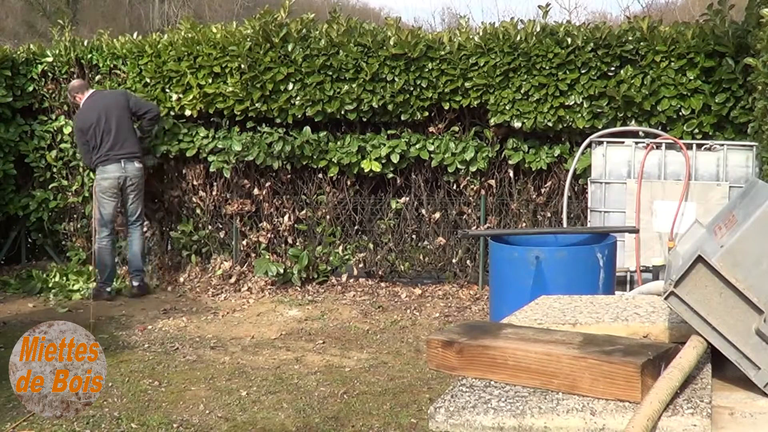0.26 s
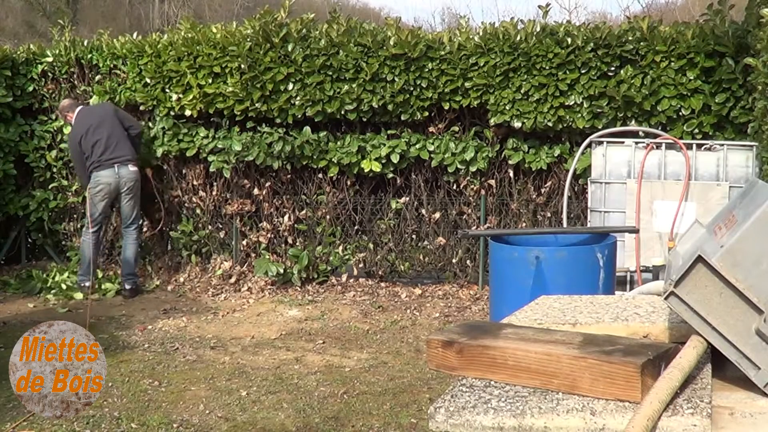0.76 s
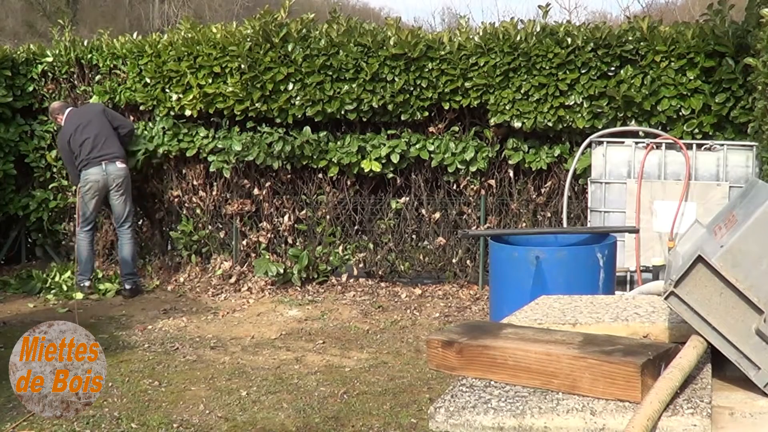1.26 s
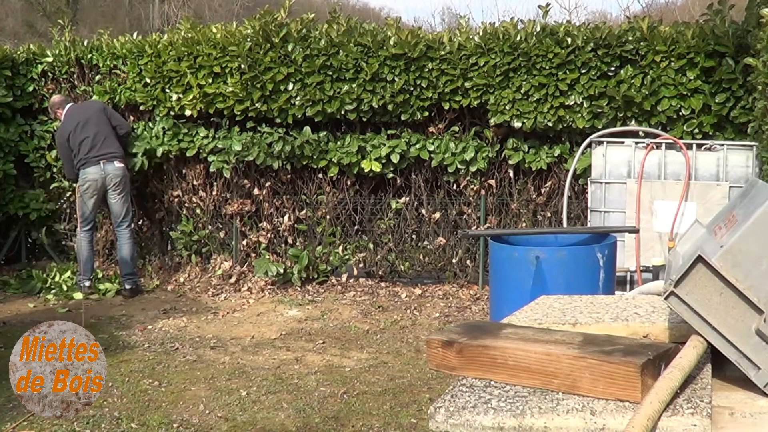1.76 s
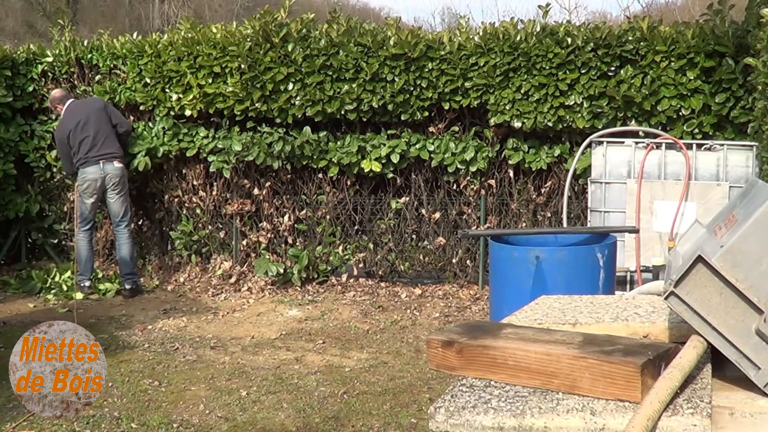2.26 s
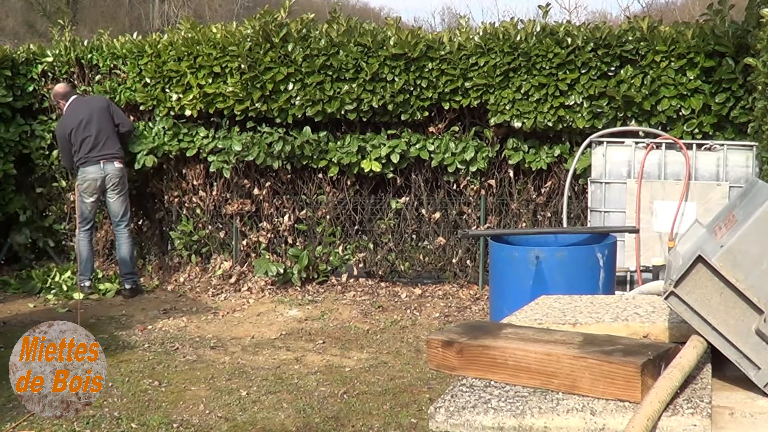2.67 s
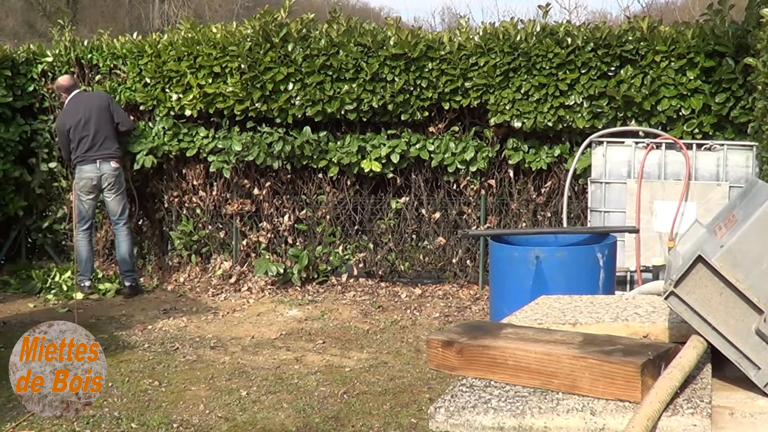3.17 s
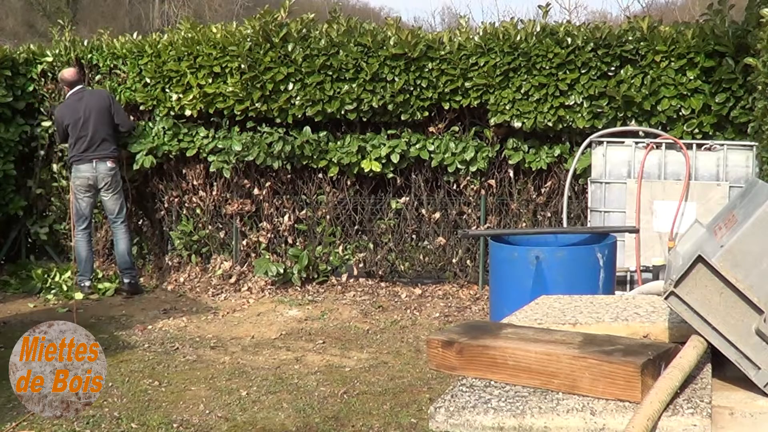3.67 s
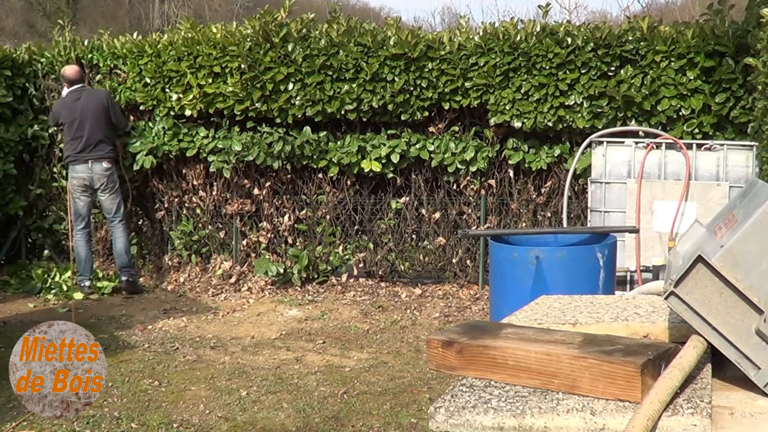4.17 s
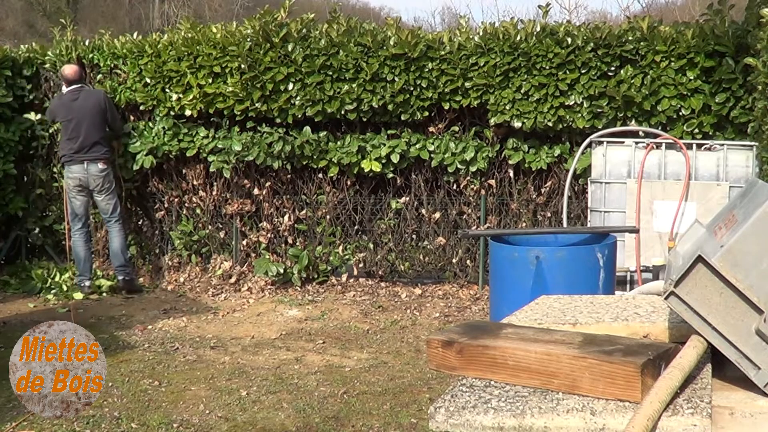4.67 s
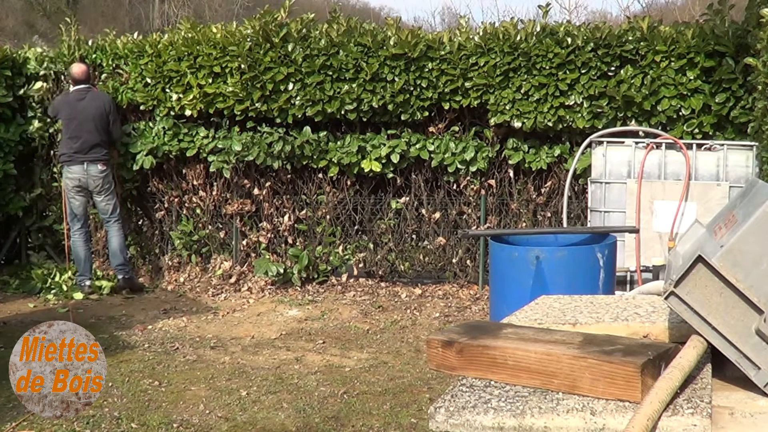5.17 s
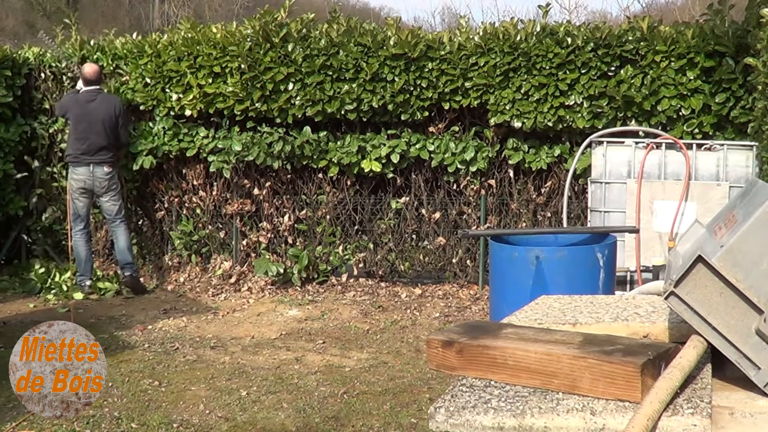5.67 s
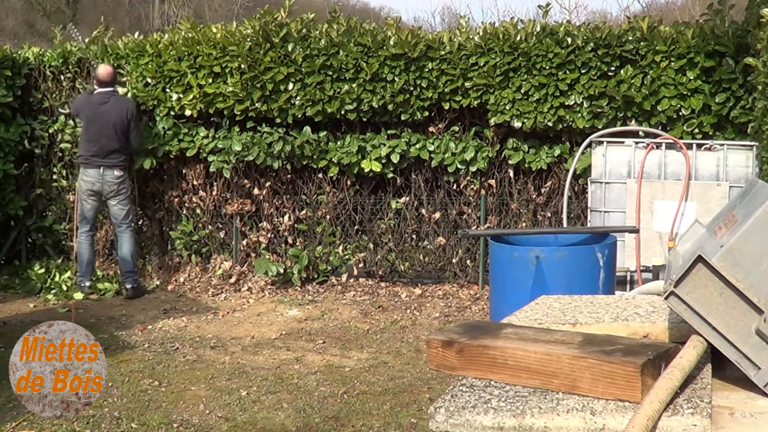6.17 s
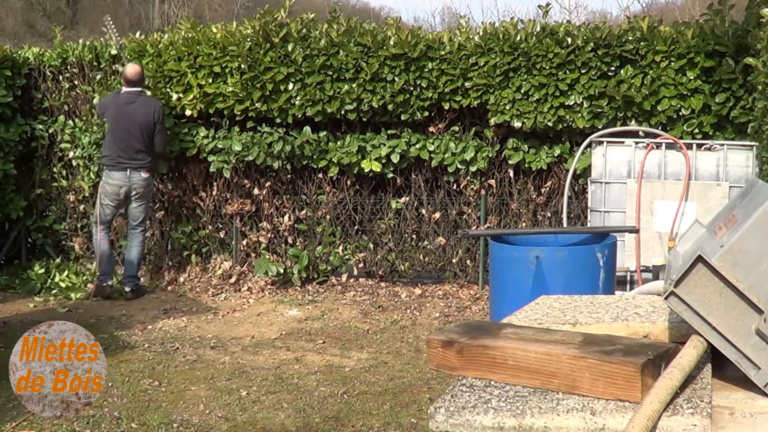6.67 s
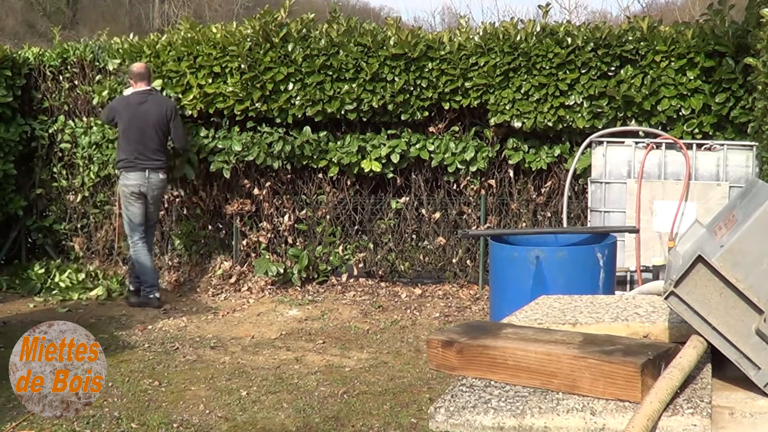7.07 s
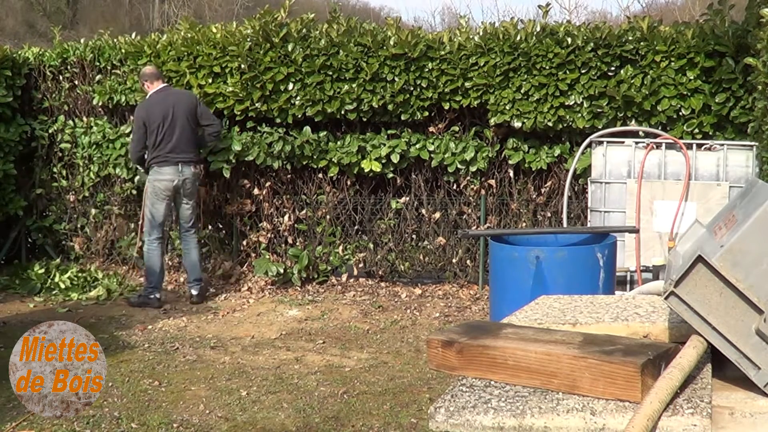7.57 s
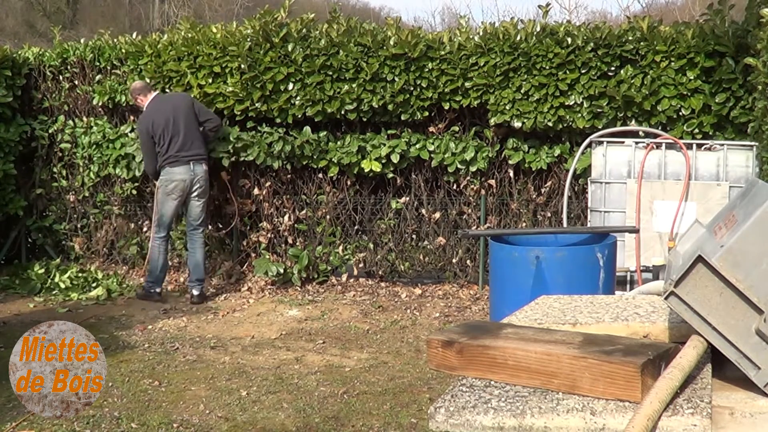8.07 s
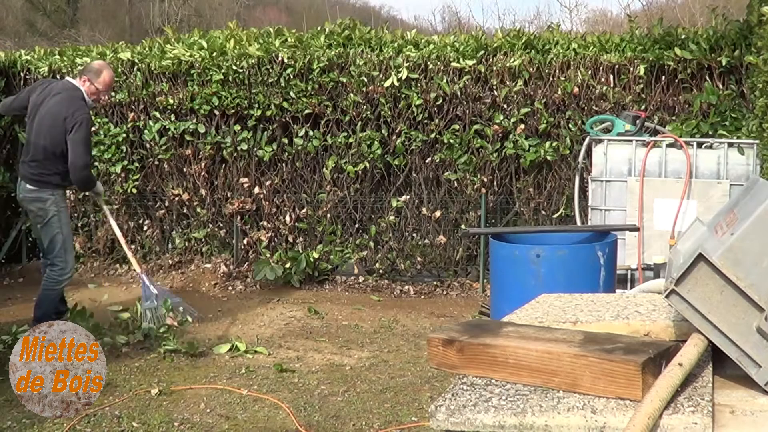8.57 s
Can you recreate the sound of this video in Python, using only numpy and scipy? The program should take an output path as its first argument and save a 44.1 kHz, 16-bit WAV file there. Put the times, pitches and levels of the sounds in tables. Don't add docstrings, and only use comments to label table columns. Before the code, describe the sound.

A stereo camera microphone a few metres off picks up a hedge trimmer starting, roaring with harsh bright hiss, gear whine and casing rattle, and chopping woody stems. After about seven seconds its pitch slides down and stops. Twigs tick, soft steps and a puff of wind thump low, then a wire rake scratches and snags sharply through leaves, over distant traffic and engine hum.

```python
import sys
import numpy as np
from scipy import signal
from scipy.fft import rfft, irfft, next_fast_len
from scipy.io import wavfile
from scipy.ndimage import uniform_filter1d

SR = 44100
rng = np.random.default_rng(int(sys.argv[2]) if len(sys.argv) > 2 else 0)


def transcribe(u):
    v = np.clip(np.atleast_2d(u).T, -1, 1)
    q = np.round(v * 32767).astype(np.int16)
    wavfile.write(sys.argv[1], SR, q)


def decibels_to_gain(level_db):
    exponent = np.asarray(level_db, float) / 20
    return 10 ** exponent


N = 389403
T = np.arange(N) / SR
SCENE_CHANGE_S = 8.163
SIDES = np.array([[1], [-1]])

# frequency in Hz, density in dB per Hz.
HUSH_COLOUR = [(15, -37), (25, -23), (43, -1.5), (206, -5), (236, 0.5), (301, 0), (363, -5), (394, -2.5),
               (607, -7), (887, -3), (1290, -7), (9570, -28), (14800, -42), (16000, -37)]
HUSH_LATER_COLOUR = [(15, -60), (25, -23), (91, -15.5), (233, -13), (273, -4), (420, -17.5), (700, -12),
                     (1100, -16), (1300, -8), (2000, -17), (2830, -20.5), (10300, -22.5), (12500, -35),
                     (16000, -34)]
# time in seconds, level in dB.
HUSH_LEVEL = [(0, -34), (.1, -37.5), (.4, -39), (7, -41.5), (7.9, -41), (8.15, -43.5)]
HUSH_LATER_DB = -35.5
# frequency in Hz, level in dB, width in Hz.
ENGINE_LINES = [(101, -56.5, 2.7), (130.5, -57, 2.05), (265.5, -49, 2.1)]
ENGINE_LINES_LATER = [(102.8, -52, 2.53), (135, -53, 3.014), (274, -41.5, 0.57), (283.5, -52, 0.6),
                      (298, -52, 2.1), (400, -53.5, 3.54)]
# start in seconds, length in seconds, level in dB.
GUSTS = [
    (1.0, .2, -58),
    (4.4, 1.0, -58),
    (6.25, 0.45, -57),
    (7.3, 0.23, -55),
    (7.7, 0.23, -44.5),
]
# start in seconds, peak in dB, frequency in Hz (minus: first a pull), t60 in seconds.
FOOTFALLS = [
    (7.349, -38, 46.13, 0.082),
    (7.591, -37, 59.76, 0.074),
    (7.659, -37, 51.1, 0.08),
    (7.8857, -26, -45, 0.04),
    (7.896, -36, 40, .05),
    (7.9075, -22, -110, 0.02),
    (7.921, -24, 100, 0.03),
    (7.926, -32, -50, 0.036),
]
# start in seconds, length in seconds, level in dB.
LEAF_BRUSHES = [(0.004, 0.071, -43.5), (.12, 0.14, -46), (.315, 0.019, -45), (.382, .006, -46),
                (.415, .02, -52), (7.55, 0.04, -30.5), (7.65, 0.049, -47), (7.7, 0.53, -58),
                (7.776, 0.03, -43), (7.9, .03, -65), (7.97, .02, -54), (8.07, 0.03, -47), (8.11, .06, -45),
                (7.865, .02, -59)]
# start in seconds, length in seconds, level in dB.
RAKE_DRAGS = [
    (8.165, 0.16, -25),
    (8.362, .01, -46),
    (8.66, .04, -41),
]
# frequency in Hz, density in dB per Hz.
RAKE_COLOUR = [(120, -43), (200, -6), (273, -6), (328, -9), (671, -5.5), (950, -7), (1320, -7),
               (3250, -8.5), (8740, -3), (10500, -3), (16000, -27)]
# start in seconds, peak in dB, centre frequency in Hz, length in seconds.
TINE_SLIPS = [
    (8.173, -16, 7900, 0.017),
    (8.199, -11, 8250, 0.006),
    (8.2521, -10, 9350, 0.006),
    (8.323, -10.5, 8660, 0.01),
    (8.364, -9.5, 8000, 0.007),
]
# start in seconds, peak in dB, centre in Hz, length in seconds.
TIP_RINGS = [
    (.3022, -20, 14000, .002),
    (7.532, -32, 14000, .003),
    (8.365, -12, 6700, .008),
    (8.366, -16, 10600, .006),
    (8.174, -19, 10500, .006),
    (8.324, -21, 16000, .006),
    (8.365, -24, 14500, .005),
    (8.174, -22, 14500, .006),
]
# start in seconds, peak in dB, centre in Hz, length in seconds.
CLICKS = [(0.3022, -10, 10500, 0.00099), (.303, -27, 9000, .012), (0.38, -30, 7000, 0.002),
          (.3845, -23, 10650, .002), (.425, -27, 8000, .002), (0.4125, -29, 6790, 0.005),
          (0.4335, -20, 7500, 0.005), (.429, -25, 2800, .012), (.43, -23, 800, .01),
          (0.4544, -19, 9420, 0.0054), (7.4994, -22, 7000, 0.005), (7.532, -18, 9500, 0.004),
          (7.567, -22, 6004, 0.005), (7.5994, -28, 4790, 0.005), (7.7767, -25, 6320, 0.005),
          (7.8044, -24, 8620, 0.004), (7.9029, -33, 7050, 0.0052), (7.927, -31, 5500, 0.008),
          (7.973, -30, 3300, 0.003)]
# start in seconds, peak in dB, centre in Hz, length in seconds.
STEM_CHOPS = [(0.707, -18, 2260, 0.005), (0.81, -14, 1320, 0.005), (0.939, -20, 1080, 0.005),
              (1.159, -16, 1170, 0.005), (1.42, -16, 1030, 0.0046), (1.49, -14, 1620, 0.005),
              (1.848, -17, 810, 0.0043), (2.346, -14, 2080, 0.005), (2.808, -6, 1550, 0.005),
              (2.856, -10, 1520, 0.005), (2.972, -20, 2410, 0.005), (3.021, -13, 1530, 0.005),
              (3.112, -11, 2080, 0.005), (3.16, -13, 2340, 0.005), (3.869, -11, 2094, 0.005),
              (4.199, -15, 1800, 0.005), (4.288, -5, 1530, 0.0054), (4.535, -17, 1460, 0.005),
              (4.624, -16, 1490, 0.005), (4.729, -13, 1680, 0.005), (4.78, -8, 1490, 0.005),
              (4.93, -6, 1610, 0.0054), (5.033, -6.5, 1800, 0.0055), (5.107, -7, 1180, 0.005),
              (5.58, -13, 1570, 0.005), (5.649, -14, 2280, 0.005), (5.674, -5, 2450, 0.005),
              (5.77, -13, 1120, 0.0046), (5.797, -14, 2270, 0.005), (5.934, -7, 1810, 0.0058),
              (6.288, -10, 2460, 0.005), (6.333, -5, 2475, 0.0048), (6.379, -12, 1765, 0.005),
              (6.85, -13, 2690, 0.005)]
CHOP_DB = -2.5
# time in seconds, load from 0 to 1.
BLADE_LOAD = [
    (.44, .3),
    (.6, .4),
    (.75, 1),
    (6.93, 1),
    (7.02, .1),
    (7.78, .1),
]
# frequency in Hz, density in dB per Hz.
BLADE_COLOUR = [(200, -17), (320, -14.5), (600, -3.5), (1100, -5.5), (1330, -8), (1550, -5), (2400, -4.5),
                (4000, -4), (7000, -1.5), (9700, 1), (10800, -0.5), (12000, -7.5), (13800, -8.5),
                (16000, -19.5)]
# time in seconds, rate in Hz.
TOOTH_RATE = [(1.2, 1660), (2.2, 1610), (2.55, 1508), (2.8, 1544), (3.3, 1496), (4.12, 1604), (4.28, 1480),
              (4.78, 1469), (4.84, 1435), (5.15, 1436), (5.3, 1590), (5.55, 1626), (5.63, 1473),
              (5.72, 1450), (5.95, 1519), (6.5, 1533), (6.8, 1700), (6.96, 1495)]
ON_S, OFF_S = .428, 6.96
SPIN_UP_HZ, SPIN_UP_S = 980.7, .26
FRICTION_HZ, COAST_S = 3466, 2.8
TEETH_PER_TURN, PINION_TEETH = 70, 4
# multiple of the rotor turns, level in dB while cutting.
ROTOR_ORDERS = [(1, -48), (2, -56), (3, -68), (6, -68), (8, -39), (12, -64)]
# start in seconds, length in seconds, level in dB.
MESH_SONGS = [(.512, 0.04, -29), (.57, .04, -39), (1.29, .07, -32), (1.45, 0.16, -36), (1.69, 0.33, -35),
              (2.53, 0.087, -30.5), (2.65, 0.26, -31), (2.95, 0.22, -33), (4.1, 0.041, -30),
              (4.3, 0.34, -29.5), (4.715, .07, -27.5), (5.03, 0.02, -36), (5.1, .015, -33),
              (5.42, 0.04, -31), (5.5, 0.063, -30), (5.56, .02, -29), (5.62, 0.07, -31), (5.95, 0.13, -36),
              (6.1, 0.098, -31.5), (6.81, 0.02, -35), (6.86, .015, -31)]
MESH_DB = -41
# frequency in Hz, level in dB.
RADIATION = [(400, -52), (500, -47), (600, -27), (900, -30), (1200, -23.5), (1600, -30), (2500, -34.5),
             (3500, -23), (4400, -44)]
# time in seconds, length in seconds, gain in dB.
BACKLASH = [
    (6.989, 0.044, -10),
    (7.108, 0.013, -13),
    (7.35, 0.017, -8),
    (7.447, 0.018, -3),
    (7.51, 0.059, -5.5),
    (7.731, 0.056, -14),
]
# start in seconds, length in seconds, level in dB.
SECOND_SONGS = [
    (7.07, 0.11, -37),
    (7.2, 0.11, -40),
    (7.38, 0.046, -33),
    (7.455, 0.059, -37),
    (7.575, 0.1, -39.5),
]
THIRD_SONGS = [
    (7.1, .03, -36),
    (7.17, 0.058, -36),
    (7.29, .04, -44),
    (7.46, 0.039, -54),
    (7.585, 0.048, -43),
]
FOURTH_SONGS = [
    (7.19, .015, -43),
    (7.29, .015, -40),
    (7.36, 0.091, -43),
    (7.55, .02, -52),
]
# frequency in Hz, width in Hz, level in dB relative to the hiss.
HOUSING_MODES = [(825, 6.7, -31.5), (1145, 190, -25), (1704, 170, -24), (2250, 31, -26.5), (2410, 72, -28),
                 (2556, 250, -34), (3240, 210, -34), (3824, 92, -25.5), (4800, 340, -33)]
# start in seconds, level in dB, frequency in Hz, length in seconds.
TWIG_BITES = [(0.907, -33, 1200, 0.3), (1.17, -35.0, 2580.0, 0.034), (1.265, -39, 4260.0, 0.031),
              (1.358, -36, 950.0, 0.054), (1.524, -31, 2930.0, 0.16), (1.564, -34, 900.0, 0.21),
              (1.816, -34.5, 880, 0.23), (2.441, -33, 3230.0, 0.048), (3.026, -29, 4390.0, 0.025),
              (3.096, -31, 2070.0, 0.05), (3.29, -32, 2340, 0.03), (4.56, -41, 2900, 0.21),
              (4.78, -33, 3900, .07), (4.98, -33, 3900, 0.065), (5.04, -35, 2350, .2),
              (.69, -33, 2250, .08), (.68, -37, 3070, .25), (.88, -34, 2250, .15), (4.6, -35, 1120, 0.23),
              (5.08, -36, 1120, .15), (6.551, -33, 1600, .2), (5.3, -34, 1100, 0.27),
              (1.3, -36.5, 1110, .8), (3.15, -35, 3100, .15), (3.602, -32, 2063, 0.043),
              (3.779, -28.5, 2070.0, 0.053), (4.541, -32, 3830.0, 0.031), (4.699, -37.0, 4390.0, 0.037),
              (5.606, -30, 2282, 0.23), (5.626, -30, 4350.0, 0.048), (5.648, -32, 2930.0, 0.043),
              (5.892, -30, 1150, 0.071), (5.909, -29, 1854, 0.035), (5.913, -31, 4574, 0.17),
              (6.012, -32, 1810.0, 0.048), (6.13, -34, 4390.0, 0.043), (6.153, -32, 1160.0, 0.052),
              (6.169, -32, 2110.0, 0.045), (6.174, -30, 2630.0, 0.173), (6.266, -32, 1850.0, 0.112),
              (6.316, -31, 4010.0, 0.022), (6.454, -28, 2146, 0.067), (6.618, -34, 4290, 0.031),
              (6.708, -30.5, 2680, 0.17), (6.748, -28.5, 1714, 0.13), (6.763, -30, 3360.0, 0.077),
              (6.911, -26, 3360.0, 0.028)]
HISS_DB, HISS_DB_PER_OCTAVE, IDLE_DB = -20, 13, -3
# level in dB facing away, gain in dB by facing,
# gain in dB per octave slower.
PART_LAWS = [(-10.5, 3.5, 10), (-8.5, -4.5, 8), (-23, 9, 6)]
# time in seconds, share of the gearbox side shown from 0 to 1.
FACING = [(.5, 0), (1.1, 0.1), (1.6, 0.05), (2.2, 0.25), (2.7, 0.25), (3.2, 0.83), (3.6, 0.7), (4.1, 0.78),
          (4.9, 0.78), (5.3, 0.9), (5.7, 0.75), (6.3, 0.8), (7, 0.85), (7.5, 0.52)]
CASING_HIDDEN = 0.2
# time in seconds, length in seconds, hiss in dB, gearbox in dB.
SNAGS = [(1.204, .03, 0.5, 4), (1.502, .03, 0, 1), (2.718, 0.052, -2.5, -4), (2.872, 0.023, 1, 7),
         (2.93, 0.068, -2, -4), (3.2, 0.017, -3, 9), (3.272, 0.019, -3, 1), (2.3, 0.011, 0.5, -20),
         (5.164, 0.12, -1, -4), (.66, 0.039, 2, -2), (.75, 0.077, 1, 2), (.95, 0.086, 0.6, 0),
         (4.46, 0.22, 0, -0.5), (5.701, 0.15, 0, 1.5), (6.25, 0.095, 0, 3), (6.983, 0.015, -0.5, 11),
         (7.52, 0.067, 5.5, -6)]


def curve(table):
    s, *columns = np.transpose(table)
    return [np.interp(T, s, column) for column in columns]


def during(t0, t1, fade=0.0017):
    return np.clip(np.minimum(T - t0, t1 - T) / fade, 0, 1)


def swells_db(rows, rise_s, fall_s):
    gain = 0
    for s, length, db in rows:
        early, late = np.maximum(s - T, 0), np.maximum(T - s - length, 0)
        gain = gain + decibels_to_gain(db) * np.exp(-early / rise_s - late / fall_s)
    return 20 * np.log10(gain + 1e-9)


def walk(rate):
    hold = int(SR / rate)
    return uniform_filter1d(np.repeat(rng.standard_normal(N // hold + 1), hold), hold)[:N]


def flicker(rate):
    x = walk(rate)
    return x - uniform_filter1d(x, int(6 * SR / rate))


def filtered(x, order, hz, kind):
    return signal.sosfilt(signal.butter(order, hz, kind, fs=SR, output="sos"), x)


def grains(rate, spread_db):
    sizes = decibels_to_gain(spread_db * np.minimum(rng.exponential(size=N), 3.5))
    starts = (rng.random(N) < rate / SR) * sizes
    decay = np.exp(-1 / (0.00057 * SR))
    x = rng.standard_normal(N) * signal.lfilter([1], [1, -decay], starts)
    return x / x.std()


def bands(x, colour, ref, gain_db):
    size = next_fast_len(N)
    f = np.maximum(np.arange(size // 2 + 1) * SR / size, 1)
    hz, db = np.transpose(colour)
    shape = decibels_to_gain(np.interp(np.log(f), np.log(hz), db))
    inside = (f > ref[0]) & (f < ref[1])
    spec = rfft(x, size) * shape / np.sqrt(np.sum(shape[inside] ** 2) / len(f))
    out = 0
    for step in range(int(2 * np.log2(hz[0])), int(2 * np.log2(hz[-1])) + 2):
        share = np.cos(np.pi / 2 * np.clip(2 * np.log2(f) - step, -1, 1)) ** 2
        out = out + irfft(spec * share, size)[..., :N] * decibels_to_gain(gain_db(2 ** (step / 2)))
    return out


def hits(table, width, top_hz=12000):
    out, t = np.zeros(N + SR), np.arange(SR // 8) / SR
    for s, db, hz, length in table:
        edges = np.clip([hz / width, hz * width], 20, top_hz)
        noise = filtered(rng.standard_normal(len(t)), 2, edges, "band")
        start = int(s * SR)
        out[start:start + len(t)] += decibels_to_gain(db - 9.5) * noise / noise.std() * np.exp(-(t / length) ** 2)
    return out[:N]


def drone(lines):
    out = 0
    for hz, db, width in lines:
        phase = 2 * np.pi * np.cumsum(hz + width * walk(6)) / SR
        out = out + decibels_to_gain(db + 2 + 1.1 * walk(11.0)) * np.sin(phase)
    return out


def garden():
    mid, side = rng.standard_normal((2, N))
    side = filtered(side, 1, 250, "high") + 0.097 * side
    air = mid + 0.29 * side * SIDES
    level_db, = curve(HUSH_LEVEL)

    def before_db(hz):
        return level_db + walk(9.6) + (hz < 70) * -1.5

    def after_db(hz):
        return HUSH_LATER_DB + 1.2 * walk(5.3)

    before = bands(air, HUSH_COLOUR, (25, 16000), before_db) + drone(ENGINE_LINES)
    after = bands(air, HUSH_LATER_COLOUR, (25, 16000), after_db) + drone(ENGINE_LINES_LATER)
    return before * during(-1, SCENE_CHANGE_S) + after * during(SCENE_CHANGE_S, 10)


def wind():
    puffs = filtered(rng.standard_normal((2, N)), 2, [33, 70], "band")
    puffs = puffs[0] + 0.17 * puffs[1] * SIDES
    return puffs / puffs.std() * decibels_to_gain(swells_db(GUSTS, rise_s=.08, fall_s=0.11))


def footfalls():
    out = 0
    for s, db, hz, t60 in FOOTFALLS:
        decay = (T > s) * np.exp(-np.log(1000) * np.abs(T - s) / t60)
        out = out + decibels_to_gain(db) * np.sin(2 * np.pi * hz * (T - s)) * decay
    return out


def rustle():
    level_db = swells_db(LEAF_BRUSHES, rise_s=.006, fall_s=0.038)
    leaves = rng.standard_normal(N) + 0.54 * grains(1200, spread_db=6.0)

    def gain_db(hz):
        return level_db + (hz > 9000) * 0.52 + walk(30)

    bright = bands(leaves / leaves.std(), BLADE_COLOUR[6:], (3500, 12000), gain_db)
    return bright * (during(-1, .43) + during(7.55, SCENE_CHANGE_S, fade=0.11))


def rake():
    top_db = swells_db(RAKE_DRAGS, rise_s=0.0026, fall_s=0.091)
    low_db = -12.5 - 0.59 * (top_db + 23.5)
    grit = rng.standard_normal(N) + 0.61 * grains(2500, spread_db=4.0)
    shared = 0.75 * walk(50)

    def gain_db(hz):
        return top_db + shared + 0.86 * walk(25) + (hz < 2200) * (low_db + 9.0)

    return during(SCENE_CHANGE_S, 10) * bands(grit / grit.std(), RAKE_COLOUR, (3000, 12000), gain_db)


def snaps():
    small = hits(CLICKS, width=1.54) + hits(TINE_SLIPS, width=1.7)
    ringing = hits(TIP_RINGS, width=1.1, top_hz=15700)
    return small + ringing + decibels_to_gain(CHOP_DB) * hits(STEM_CHOPS, width=2.14)


def tooth_rate():
    hz = curve(TOOTH_RATE)[0] - SPIN_UP_HZ * np.exp(-np.maximum(T - ON_S, 0) / SPIN_UP_S)
    slowing = np.exp(-np.maximum(T - OFF_S, 0) / COAST_S)
    return np.maximum((hz + FRICTION_HZ) * slowing - FRICTION_HZ, 100)


def coasting_levels_db(hz):
    at, sent_db = np.transpose(RADIATION)
    loose_db = sum(db * np.exp(-((T - s) / length) ** 2) for s, length, db in BACKLASH)
    levels = [loose_db + np.interp(np.log(hz), np.log(at), sent_db)]
    for songs in (SECOND_SONGS, THIRD_SONGS, FOURTH_SONGS):
        levels.append(swells_db(songs, rise_s=0.0085, fall_s=0.014) + 0.5)
    return levels


def whine():
    coasting, hz, (load,) = T > OFF_S, tooth_rate(), curve(BLADE_LOAD)
    jitter = np.where(coasting, .008, .013 * load) * flicker(70)
    phase = 2 * np.pi * np.cumsum(hz * (1 + jitter)) / SR
    crank = phase / TEETH_PER_TURN
    beads_db = 2.2 * np.cos(crank) + 3.5 * np.cos(2 * crank) + 1.2 * np.cos(4 * crank)

    song_db = np.maximum(swells_db(MESH_SONGS, rise_s=0.013, fall_s=.02), MESH_DB)
    cutting = decibels_to_gain(song_db + load * (beads_db + 1.8 * flicker(35)) - .5) * np.sin(phase)
    rotor = 0
    for order, db in ROTOR_ORDERS:
        rotor = rotor + decibels_to_gain(db + 1.1 * walk(3.37) + beads_db) * np.sin(order * phase / PINION_TEETH)
    cutting += rotor * during(0.6, 7.0, fade=0.53)

    free = 0
    for k, db in enumerate(coasting_levels_db(hz)):
        level = decibels_to_gain(db + 0.73 * beads_db + (1.6 + 0.3 * k) * flicker(25))
        free = free + level * np.sin((k + 1) * phase + 0.3 * k * flicker(150))
    return np.where(coasting, free, cutting) * during(0.38, 7.78, fade=0.029), hz, crank


def running_db(hz):
    slower, (facing,) = -np.log2(np.minimum(hz / 1500, 1)), curve(FACING)
    hiss_jolt, gear_jolt = 0, 0
    for s, length, hiss, gear in SNAGS:
        jolt = np.exp(-((T - s) / length) ** 2)
        hiss_jolt, gear_jolt = hiss_jolt + hiss * jolt, gear_jolt + gear * jolt
    idle_db = IDLE_DB * during(OFF_S, 10, fade=0.21)
    hiss_db = HISS_DB - HISS_DB_PER_OCTAVE * slower + idle_db + hiss_jolt
    shown = [facing, np.minimum(facing / CASING_HIDDEN, 1), facing]
    gear_db, case_db, handle_db = (db + turn * side + slow * slower
                                   for (db, turn, slow), side in zip(PART_LAWS, shown))
    return hiss_db, gear_db + gear_jolt + 0.62 * walk(6), case_db, handle_db


def housing(rattle, crank):
    out = 0
    for hz, width, db in HOUSING_MODES:
        ring = signal.lfilter(*signal.iirpeak(hz, hz / width, fs=SR), rattle)
        flutter_db = 4.4 * np.cos(2 * crank + rng.random()) + 2.3 * np.cos(4 * crank)
        out = out + ring / ring.std() * decibels_to_gain(db + 2.1 * walk(10) + flutter_db)
    return out


def bites(crank):
    out = np.zeros(N)
    for s, db, hz, length in TWIG_BITES:
        a, b = int((s - .05) * SR), int((s + length + .1) * SR)
        t, turn = T[a:b], crank[a:b]
        ring = signal.lfilter(*signal.iirpeak(hz, hz / 200, fs=SR), rng.standard_normal(b - a))
        shape = np.exp(-np.maximum(s - t, 0) / 0.0073 - np.maximum(t - s - length, 0) / 0.02)
        flutter_db = 2.9 * np.cos(2 * turn) + 1.3 * np.cos(4 * turn)
        out[a:b] += ring / ring.std() * shape * decibels_to_gain(db - 2.5 + flutter_db)
    return out


def trimmer():
    teeth, hz, crank = whine()
    load, = curve(BLADE_LOAD)
    crossing = np.cos(4 * crank)
    stroke = 0.036 * load * crossing + 0.041 * np.cos(crank)
    stroke += 0.029 * np.cos(2 * crank + 0.44 * walk(9.8)) + 0.034 * np.cos(4 * crank + 5.5 * walk(8))
    rub = rng.standard_normal(N) * (1 + stroke) + 0.56 * load * grains(1500, spread_db=2.5)
    hiss_db, gear_db, case_db, handle_db = running_db(hz)
    parts_db = [handle_db + 15.0, case_db + 12.5, 0.61 * gear_db + 5.5, 0 * T]
    shared = 0.15 * flicker(32) + 1.3 * flicker(60)
    slow_db = 6.9 * np.log2(np.clip(hz / 1500, .3, 1))

    def gain_db(band_hz):
        place = np.interp(np.log(band_hz), np.log([607, 990, 2140, 4900]), range(4))
        part_db = sum(max(1 - abs(place - k), 0) * db for k, db in enumerate(parts_db))
        treble_db = (band_hz > 11000) * slow_db
        chatter_db = (band_hz < 3500) * 0.56 * load * crossing
        unsteady_db = (0.25 + 0.062 * place) * shared + flicker(22)
        return hiss_db + part_db + treble_db + chatter_db + unsteady_db

    hiss = bands(rub / rub.std(), BLADE_COLOUR, (4000, 12000), gain_db)
    modes = housing(rub, crank) * decibels_to_gain(hiss_db) * load
    return (teeth + modes + bites(crank) + hiss) * during(ON_S, 7.8, fade=0.0037)


def hedge(x, t60=.1, wide_db=-14.5, centre_db=-15., lead_db=-9., turns=2.5):
    t = np.arange(SR // 5) / SR
    scatter = rng.standard_normal((2, 2, len(t))) * np.exp(-np.log(1000) * t / t60)
    scatter = filtered(scatter, 2, [200, 10500], "band")
    scatter /= np.sqrt(np.sum(scatter ** 2, axis=2, keepdims=True))
    here, there = signal.fftconvolve(x[None, None], scatter, axes=2)[..., :N]
    place = 2 * np.pi * turns * (T + 0.1 * np.array([walk(1.4), walk(1.957)]))
    wide, centre = here * np.cos(place) + there * np.sin(place)
    middle = signal.sosfiltfilt(signal.butter(1, [250, 3000], "band", fs=SR, output="sos"), x)
    wide = wide - decibels_to_gain(lead_db - wide_db) * signal.hilbert(middle, next_fast_len(N)).imag[:N]
    return (x + decibels_to_gain(centre_db) * centre) * decibels_to_gain(1.26 * SIDES) + decibels_to_gain(wide_db) * wide * SIDES


def scene():
    background = garden() + wind() + footfalls()
    return background + hedge(rustle() + rake() + snaps() + trimmer())


def band_limit(x):
    return signal.sosfilt(signal.butter(12, 17030, fs=SR, output="sos"), x)


def record(dry):
    left, right = np.tanh(1.3 * dry) / 1.3
    mid, side = (left + right) / 2, (left - right) / 2
    side = signal.sosfiltfilt(signal.butter(6, 11600, fs=SR, output="sos"), side) + 0.21 * side
    scanning = (T * 50 + .08) % 1 > .14
    mid = mid + decibels_to_gain(-56) * scanning * np.sin(2 * np.pi * 15625 * T)
    top_cut = signal.ellip(10, .2, 90, 15750, fs=SR, output="sos")
    both = signal.sosfilt(top_cut, [mid + side, mid - side])
    return band_limit(both)


dry = scene()
out = record(dry)
transcribe(out)
```